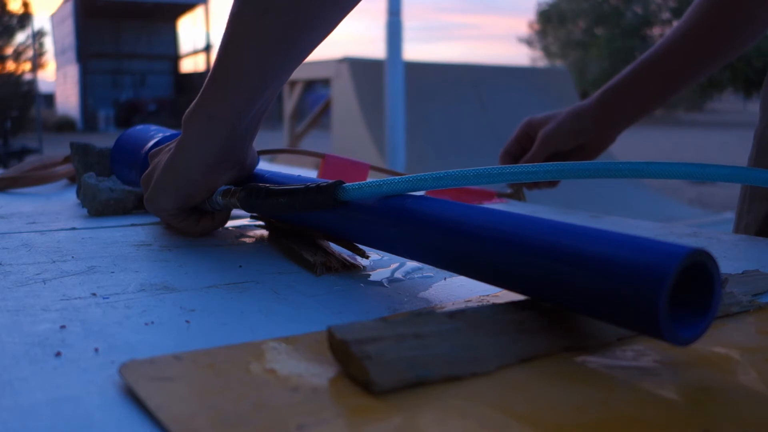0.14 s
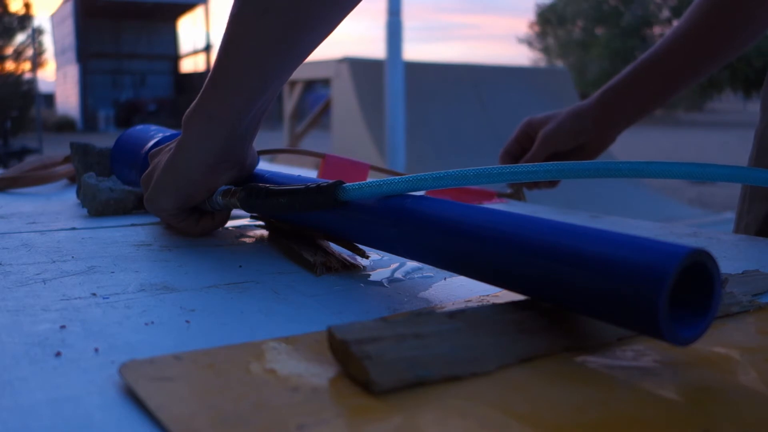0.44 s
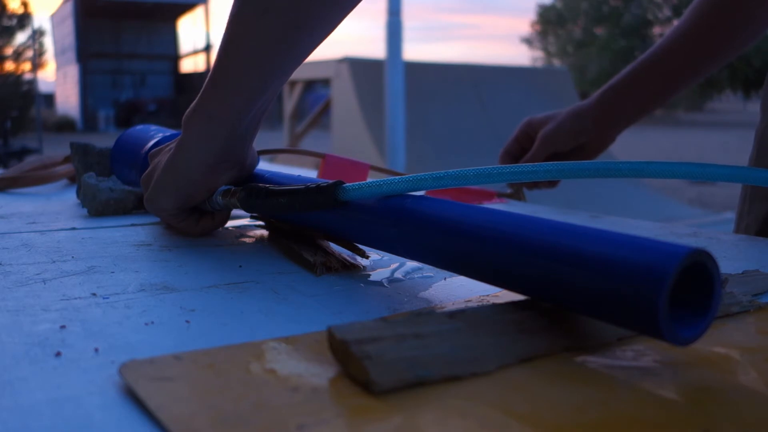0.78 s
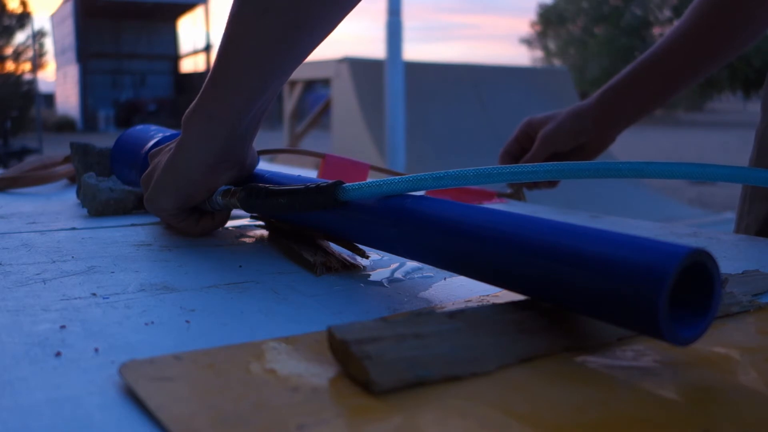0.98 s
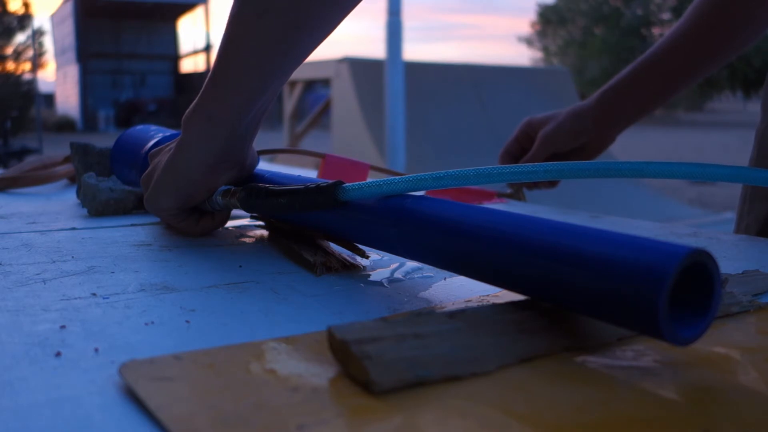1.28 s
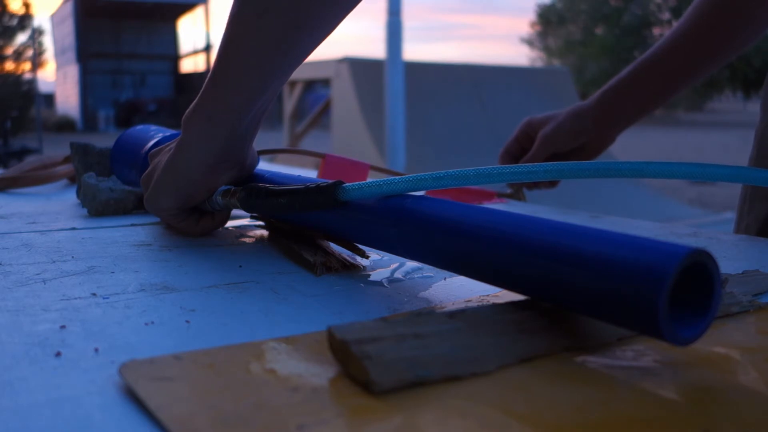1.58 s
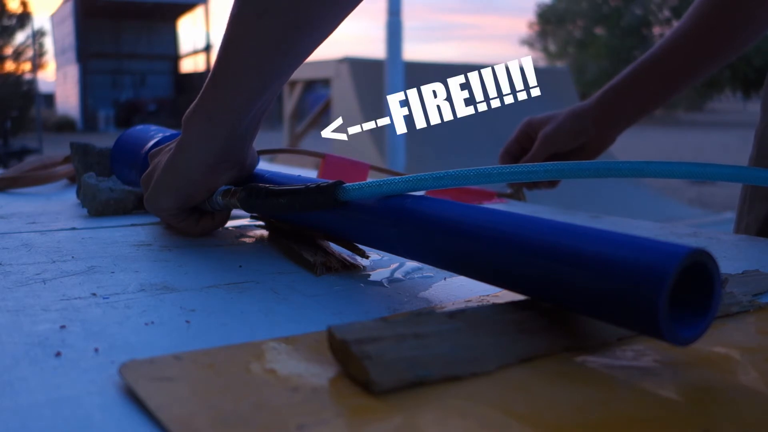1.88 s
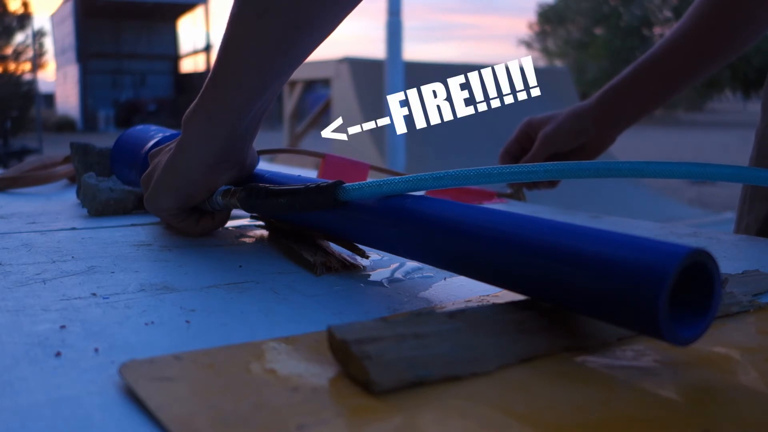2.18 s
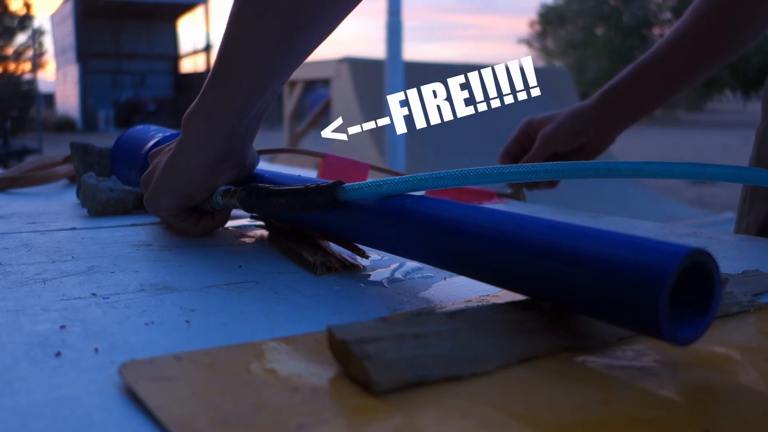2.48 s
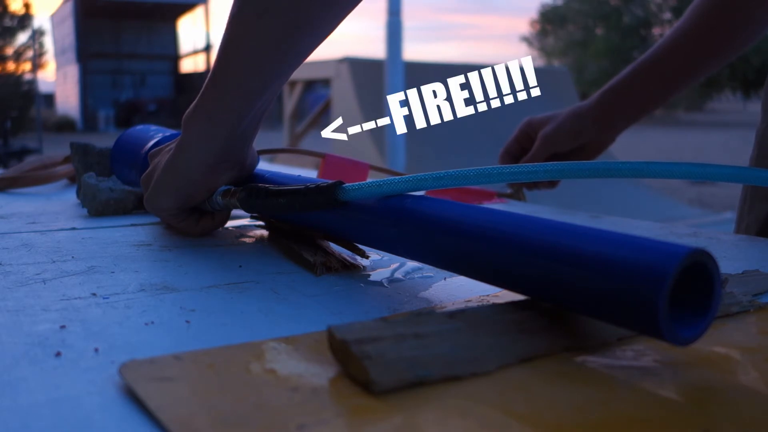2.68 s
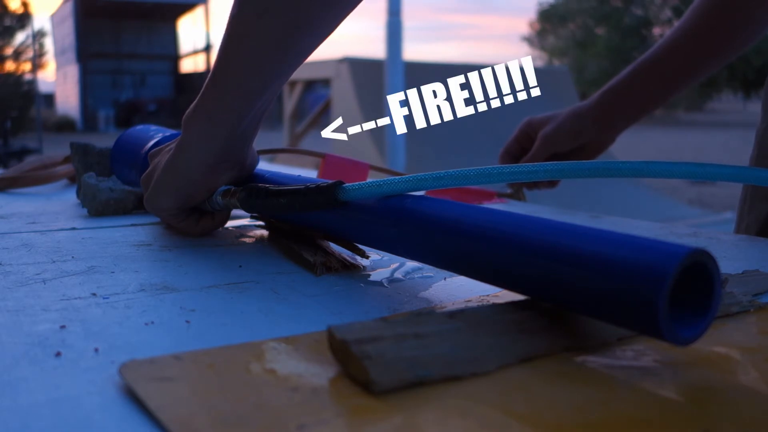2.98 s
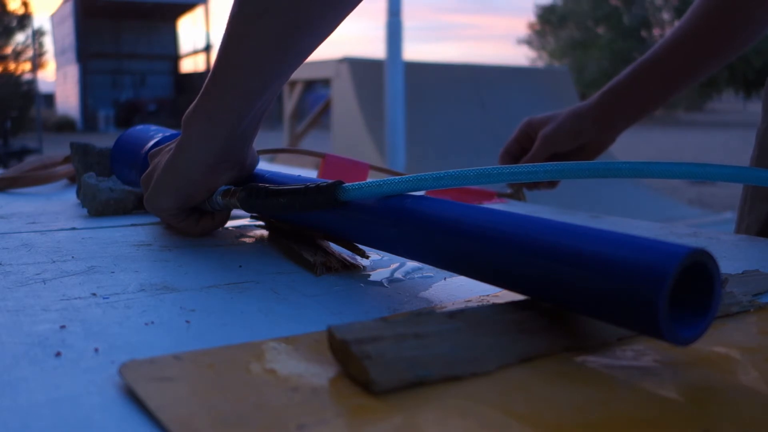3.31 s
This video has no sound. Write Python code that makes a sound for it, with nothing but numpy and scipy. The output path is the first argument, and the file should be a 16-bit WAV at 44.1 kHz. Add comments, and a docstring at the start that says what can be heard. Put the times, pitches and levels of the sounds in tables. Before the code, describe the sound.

A small homemade jet engine drones with a loud, steady, hoarse roar outdoors.

```python
"""A droning roar throughout: a home-made pulsejet, a plastic pipe fed with gas, burns on a table outdoors.
The turbulent flame rings the pipe's air column, whose notes waver, surge and creep higher as it warms.
The gas jet at the intake adds hiss and hoarse whistling, and the burning gas a rough crackle with short spits.
Two microphones hear it with weak treble echoes; a fast limiter ducks everything, hiss too, under loud surges."""
import sys
import numpy as np
from scipy import signal
from scipy.fft import rfft, irfft, next_fast_len
from scipy.io import wavfile
from scipy.ndimage import uniform_filter1d, map_coordinates

SR = 44100
rng = np.random.default_rng(int(sys.argv[2]) if len(sys.argv) > 2 else 0)


def dump_mix(stems):
    """Bounce the given channels to the path in sys.argv[1] as a 16-bit WAV at rate SR."""
    frames = np.atleast_2d(stems).T  # one column per channel
    limited = np.clip(frames, -1, 1)  # hard clip at full scale
    pcm = np.round(limited * 32767).astype(np.int16)
    wavfile.write(sys.argv[1], SR, pcm)


N = 152145  # length in samples


def amp(db):
    """Turn decibels into a gain."""
    return 10 ** (np.asarray(db) / 20)


def unit(x):
    """Scale a sound to an average (rms) strength of 1."""
    return x / np.sqrt(np.mean(np.abs(x) ** 2) + 1e-20)


def along(points, hz):
    """Read a curve of (pitch_hz, value) points, joined on a logarithmic pitch axis."""
    point_hz, values = np.transpose(points)
    return np.interp(np.log(hz + 1), np.log(point_hz + 1), values)


def seconds():
    """Time of every sample."""
    return np.arange(N) / SR


def curve(rows):
    """Join (start_s, value) rows into one value per sample."""
    return np.interp(seconds(), *np.transpose(rows))


def swing(rows):
    """Keep only the rise and fall of a level curve about its own mean."""
    level = curve(rows)
    return level - level.mean()


def wobble(rate):
    """A smooth random curve through `rate` random points a second."""
    points = rng.standard_normal(1024)
    return map_coordinates(points, [np.arange(N) * rate / SR], mode="wrap")


def filtered(x, response):
    """Multiply the spectrum of x by a response that depends on frequency."""
    size = next_fast_len(N + 8192)
    hz = np.fft.rfftfreq(size, 1 / SR)
    return irfft(rfft(x, size) * response(hz), size)[..., :N]


def noise(spectrum):
    """Two unrelated random noises with the given colour, together of rms 1."""
    white = rng.standard_normal((2, N))
    return unit(filtered(white, lambda hz: amp(along(spectrum, hz))))


def resonance(hz, width_hz, steadiness, skirt=4):
    """Two unrelated ringings of one note, driven by turbulence; steadiness evens out their strength."""
    def envelope(f):
        # a larger skirt lets more of the drive spread far from the note
        return 1 / (1 + 2j * f / width_hz) / (1 + 1j * f / (skirt * width_hz))

    real, imaginary = filtered(rng.standard_normal((2, 2, N)), envelope)
    drive = unit(real + 1j * imaginary)
    drive = drive / (np.abs(drive) ** 2 + 0.3) ** (np.clip(steadiness, 0, 1) / 2)
    phase = 2 * np.pi * np.cumsum(hz * np.ones(N)) / SR
    return unit(np.real(drive * np.exp(1j * phase)))


# Notes of the air column [pitch_hz, width_hz, level_db, steadiness 0-1, share of wavering, rise_hz_per_s]
PIPE_NOTES = [(197.4, 21.2, -20.5, 0.38, 0.99, 0.5), (536.3, 29.6, -17, 0.23, 1, 0.5),
              (972.4, 58, -29.5, 0.16, 0.503, 23), (1451, 77, -38, 0, .4, 19)]
# How the tuning wavers with the flame, given as the second note's pitch [start_s, pitch_hz]
PIPE_TUNING = [(0.0, 518), (0.05, 501.7), (0.17, 554), (0.21, 519.6), (0.29, 534), (0.32, 562.8),
               (0.39, 510), (0.49, 541), (0.58, 506), (0.67, 539), (0.79, 502.5), (0.83, 536.2),
               (0.94, 528), (0.99, 543.7), (1.1, 534.2), (1.23, 546.7), (1.27, 518), (1.37, 566),
               (1.43, 534.3), (1.47, 538), (1.5, 505), (1.54, 546.5), (1.56, 527.6), (1.61, 555.6),
               (1.7, 525), (1.83, 554.5), (1.93, 531), (1.99, 559), (2.03, 524), (2.18, 539.5), (2.38, 543),
               (2.41, 532.4), (2.45, 549), (2.58, 532), (2.63, 569), (2.68, 544.8), (2.7, 521), (2.72, 521),
               (2.77, 578), (2.81, 523.2), (2.91, 564.7), (2.95, 544), (3.07, 536), (3.18, 562.4),
               (3.29, 542), (3.38, 578), (3.4, 544), (3.44, 553.6)]
TUNING_REF_HZ = 536  # the pitch that counts as no wavering
# Surges of the three lowest notes; only the swing about the mean is used [start_s, level_db]
FIRST_NOTE_SURGES = [(0.0, -21.0), (0.09, -22.5), (0.14, -15.0), (0.19, -19.0), (0.23, -15.5),
                     (0.28, -20.5), (0.38, -15.5), (0.41, -20.0), (0.55, -17.0), (0.58, -20.0),
                     (0.63, -14.0), (0.69, -20.5), (0.73, -16.5), (0.77, -21.0), (0.83, -17.5),
                     (0.88, -23.5), (0.91, -18.5), (1.13, -19.5), (1.15, -22.0), (1.27, -15.5),
                     (1.37, -18.5), (1.43, -22.5), (1.47, -16.0), (1.52, -19.5), (1.61, -16.5),
                     (1.7, -20.5), (1.75, -17.5), (1.81, -20.5), (1.86, -17.5), (1.9, -20.5), (1.96, -15.5),
                     (2.09, -19.5), (2.16, -17.5), (2.24, -23.5), (2.36, -16.0), (2.54, -18.0),
                     (2.57, -21.0), (2.67, -14.0), (2.9, -22.0), (2.97, -16.5), (3.08, -21.5), (3.2, -16.0),
                     (3.34, -23.5), (3.44, -17.0)]
SECOND_NOTE_SURGES = [(0.0, -16.5), (0.04, -18.0), (0.08, -13.5), (0.37, -18.5), (0.45, -12.5),
                      (0.51, -15.5), (0.67, -16.5), (0.74, -13.0), (0.77, -15.0), (0.87, -13.5),
                      (0.92, -16.0), (0.95, -14.0), (1.09, -17.0), (1.21, -12.5), (1.29, -15.0),
                      (1.33, -13.0), (1.42, -16.5), (1.46, -14.0), (1.55, -18.5), (1.64, -12.0),
                      (1.7, -17.0), (1.75, -14.0), (1.83, -15.0), (1.86, -17.5), (1.9, -14.0),
                      (1.98, -17.0), (2.14, -17.0), (2.31, -13.5), (2.34, -17.0), (2.38, -13.5),
                      (2.47, -14.0), (2.53, -18.0), (2.62, -14.0), (2.69, -19.5), (2.75, -14.0),
                      (2.81, -17.5), (2.94, -12.5), (2.99, -16.0), (3.02, -13.5), (3.22, -14.5),
                      (3.26, -19.0), (3.37, -15.0), (3.4, -19.5), (3.44, -14.0)]
THIRD_NOTE_SURGES = [(0.0, -24.5), (0.07, -35.0), (0.2, -25.5), (0.35, -30.5), (0.6, -22.0), (0.66, -28.5),
                     (0.81, -28.5), (0.87, -33.0), (0.94, -28.5), (1.1, -26.0), (1.14, -30.5),
                     (1.31, -26.5), (1.34, -29.5), (1.59, -28.5), (1.63, -25.0), (1.69, -31.0),
                     (1.86, -28.5), (2.3, -26.5), (2.38, -31.0), (2.44, -25.5), (2.49, -30.5),
                     (2.54, -26.0), (2.96, -29.5), (3.34, -25.5), (3.37, -28.5), (3.44, -25.0)]
SURGE_DEPTH = 1.35  # stretches those swings
# Colour of the flame's broad roar [pitch_hz, relative level_db per Hz]
FLAME_COLOUR = [(20, -17), (60, -15), (100, -23), (150, 5), (250, 7), (320, -9.5), (430, 6), (620, 0),
                (850, -5), (1200, -12), (2000, -12), (5000, -54)]
FLAME_DB = -25
FLICKER_DB, FLICKER_RATE = 1.9, 50  # rms size in random points, points per second


def pipe():
    """The flame roars and rings the air column; notes waver together, but surge and flicker separately."""
    waver = curve(PIPE_TUNING) / TUNING_REF_HZ - 1
    surges = [swing(FIRST_NOTE_SURGES), swing(SECOND_NOTE_SURGES), swing(THIRD_NOTE_SURGES), 0]
    drone = 0
    for (hz, width_hz, db, steadiness, share, rise), surge in zip(PIPE_NOTES, surges):
        pitch_hz = hz * (1 + share * waver) + rise * seconds()
        level_db = db + SURGE_DEPTH * surge + FLICKER_DB * wobble(FLICKER_RATE)
        drone = drone + amp(level_db) * resonance(pitch_hz, width_hz, steadiness, skirt=2.08)
    roar = amp(FLAME_DB + FLICKER_DB * wobble(FLICKER_RATE)) * noise(FLAME_COLOUR)
    return drone + roar


# Hoarse tones of the jet; negative fade means growing
# [pitch_hz, width_hz, starting level_db, steadiness 0-1, fade_db_per_s]
WHISTLE_TONES = [(2358, 104, -24, 0.22, -0.32), (4738, 300, -24, .2, 0.2), (7220, 79, -35.5, 0.05, 1),
                 (9190, 100, -38, 0, .6)]
# Rise and fall of the treble; only the swing about the mean is used [start_s, level_db]
TREBLE_LEVEL = [(0.0, -20.5), (0.06, -20.0), (0.14, -22.0), (0.33, -19.5), (0.36, -20.5), (0.57, -19.5),
                (0.62, -22.0), (0.81, -20.0), (1.17, -19.5), (1.32, -22.0), (1.4, -19.0), (1.62, -22.0),
                (1.91, -19.5), (1.98, -22.0), (2.06, -19.5), (2.46, -22.5), (2.71, -20.5), (2.76, -23.5),
                (2.85, -20.5), (2.94, -23.5), (3.07, -21.5), (3.21, -23.5), (3.29, -21.0), (3.35, -24.0),
                (3.41, -21.5), (3.44, -23.0)]
TREBLE_DEPTH = 0.82  # shrinks that swing
# Colour of the jet's hiss [pitch_hz, relative level_db per Hz]
HISS_COLOUR = [(300, 7), (1200, -10.5), (1700, -5.5), (2050, 5.5), (2650, 7.5), (2900, -3), (3400, 2),
               (3900, -5), (4300, 5.5), (5100, 1), (5550, -12), (6700, -4.5), (7600, -8.5), (8200, -14.5),
               (8700, -2.5), (9600, -3.5), (10250, -6), (10900, -3)]
HISS_DB = -20
FLUTTER_DB, FLUTTER_RATE = 1.58, 60  # shared by hiss and whistle: rms size, points per second
FLARE_DB, FLARE_RATE = 1.55, 40  # separate for each tone: rms size, points per second


def gas_jet():
    """Rushing gas hisses and whistles in one flutter; tones flare separately, the lowest slowly grows."""
    whistle = 0
    for hz, width_hz, db, steadiness, fade in WHISTLE_TONES:
        level_db = db - fade * seconds() + FLARE_DB * wobble(FLARE_RATE)
        whistle = whistle + amp(level_db) * resonance(hz, width_hz, steadiness, skirt=4.3)
    hiss = amp(HISS_DB) * noise(HISS_COLOUR)
    flow_db = TREBLE_DEPTH * swing(TREBLE_LEVEL) + FLUTTER_DB * wobble(FLUTTER_RATE)
    return amp(flow_db) * (whistle + hiss)


# Colour of the burning gas's crackle [pitch_hz, relative level_db per Hz]
CRACKLE_COLOUR = [(300, -20), (800, -2), (1400, -2), (2200, 0), (3400, 0), (4200, -3), (6000, -18),
                  (11000, -30)]
CRACKLE_DB, CRACKLE_GROWS_DB_PER_S = -31, 1.1  # level at the start, growth
CRACKLE_ROUGH_DB, CRACKLE_RATE = 2.5, 110  # rms size, random points per second
# Spits of the flame [middle_s, swell of the crackle_db]
FLAME_SPITS = [(.823, 9), (.92, 4), (1.071, 3), (1.883, 4), (2.187, 15)]
SPIT_S = .005  # spread of a spit's bell shape either side of its middle


def crackle():
    """Burning gas makes a rough noise that grows as the fire takes hold, with a few short spits."""
    t = seconds()
    spits_db = sum(db * np.exp(-.5 * ((t - middle_s) / SPIT_S) ** 2) for middle_s, db in FLAME_SPITS)
    rough_db = CRACKLE_ROUGH_DB * wobble(CRACKLE_RATE)
    level_db = CRACKLE_DB + CRACKLE_GROWS_DB_PER_S * t + rough_db + spits_db
    return amp(level_db) * noise(CRACKLE_COLOUR)


ECHO_DB, ECHO_SPREAD_S, ECHO_ABOVE_HZ = -8.5, 0.011, 3000  # level, longest delay, bass fades below


def reflections(x, count=10):
    """The table and nearby things throw back weak early copies that ripple the treble."""
    taps = np.zeros((2, SR // 20))
    for row in taps:  # different echoes at each microphone
        delay_s = rng.uniform(.001, ECHO_SPREAD_S, count)
        size = rng.standard_normal(count)
        row[(delay_s * SR).astype(int)] = size / np.linalg.norm(size)
    copies = signal.fftconvolve(x, taps, axes=1)[:, :N]
    return amp(ECHO_DB) * filtered(copies, lambda hz: hz ** 2 / (hz ** 2 + ECHO_ABOVE_HZ ** 2))


# How alike the direct sound is at the two microphones [pitch_hz, likeness 0-1]
LIKENESS = [(60, 0.65), (150, 1), (300, 0.94), (540, 0.96), (1000, 0.83), (1600, 0.54), (2400, 0.89),
            (3300, 0.69), (4400, 0.57), (5400, 0.52), (7000, 0.25), (11000, 0.54)]
# How much stronger the direct sound is on the left [pitch_hz, left over right_db]
LEFT_LEAN = [(60, -2), (200, -1), (540, -2), (1000, -1), (1500, -0.5), (2100, 2), (2650, -1.5), (3500, -1),
             (4900, 1.6), (6000, 5), (7000, -3.5), (8200, 17), (9100, 5), (10200, 3.5), (11000, 5.5)]


def scene():
    """The engine reaches two microphones, more alike in the bass than in most of the treble."""
    def middle_and_side(hz):
        # the angle shares the sound between what the microphones have in common and what differs
        angle = np.arccos(np.clip(along(LIKENESS, hz), 0, 1)) / 2
        return np.array([np.cos(angle), np.sin(angle)])

    def lean(hz):
        return amp(np.outer([.5, -.5], along(LEFT_LEAN, hz)))

    engine = pipe() + gas_jet() + crackle()
    middle, side = filtered(engine, middle_and_side)
    direct = filtered(np.array([middle + side, middle - side]), lean)
    return direct + reflections(direct)


# Bass roll-off of the microphones [pitch_hz, level_db]
BASS_ROLL_OFF = [(25, -20), (60, -12), (100, -9.5), (135, 0.5)]
LIMIT_DB, LIMIT_SLOPE, MAKEUP_DB = -18, 0.61, 1.65  # threshold, share of excess removed, added gain
LIMIT_S, TOP_HZ = .022, 11040  # stretch over which loudness is averaged, highest pitch let through


def record(dry):
    """A fast limiter turns both channels down together; deep bass is thinned and the top cut off."""
    power = uniform_filter1d(np.mean(dry ** 2, axis=0), int(LIMIT_S * SR))
    excess_db = np.maximum(10 * np.log10(np.abs(power) + 1e-12) - LIMIT_DB, 0)
    limited = dry * amp(MAKEUP_DB - LIMIT_SLOPE * excess_db)
    return filtered(limited, lambda hz: amp(along(BASS_ROLL_OFF, hz)) * (hz < TOP_HZ))


dry = scene()
out = record(dry)
dump_mix(out)
```